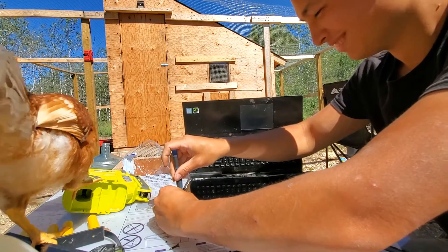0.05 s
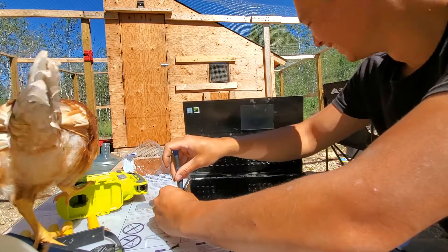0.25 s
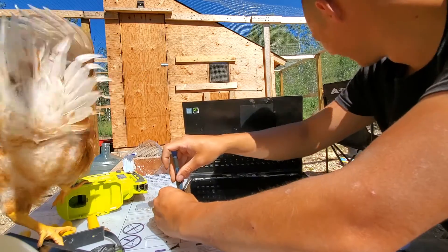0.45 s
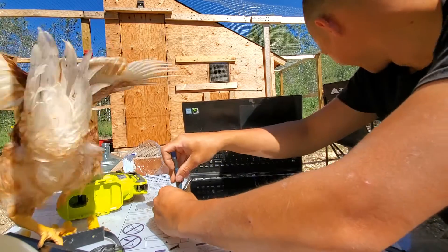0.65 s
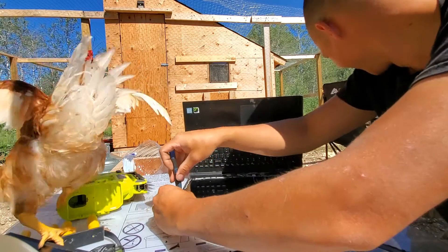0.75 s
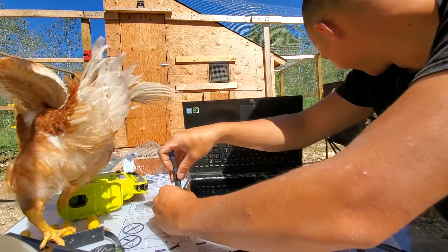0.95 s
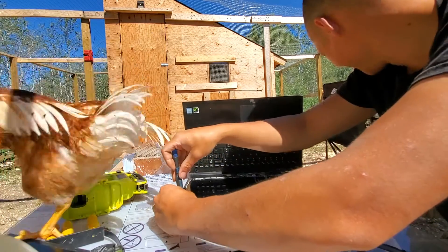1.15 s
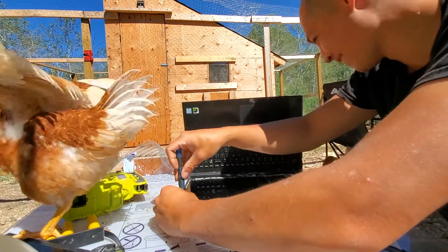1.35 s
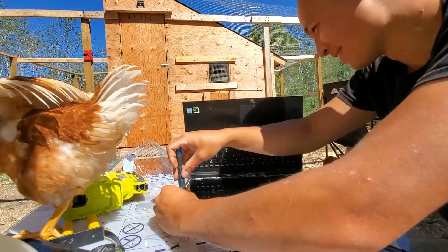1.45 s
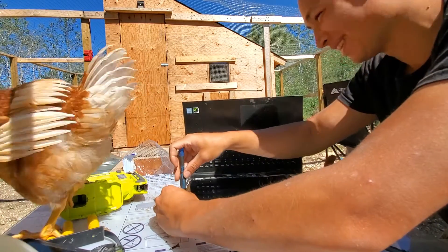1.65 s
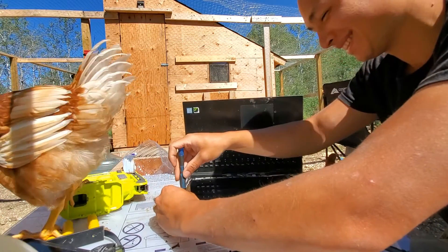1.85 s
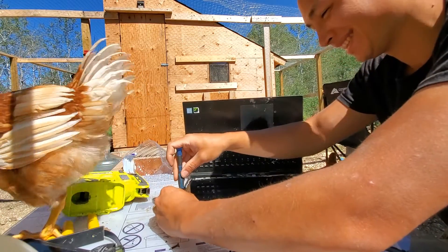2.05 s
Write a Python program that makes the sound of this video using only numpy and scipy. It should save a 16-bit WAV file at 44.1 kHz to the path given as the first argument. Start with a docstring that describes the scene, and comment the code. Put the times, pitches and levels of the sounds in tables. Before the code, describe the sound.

Wing flaps from a chicken crack and clatter in two bursts, close and slightly left in a yard, the first one louder. Feathers rustle softly in between, and puffs of air buffet the microphone over a faint hiss.

```python
"""A hen flaps her wings in two bursts on a garden table, just left of the microphone.
Each wing slap is a crack and a clatter of quills that shakes the table and echoes off the coop.
In between, feathers flick and brush and the wings sweep softly through the air.
Moving air bumps and rumbles against the microphone over a faint hiss."""
import sys
import numpy as np
from scipy import signal
from scipy.fft import rfft, irfft
from scipy.io import wavfile
from scipy.ndimage import uniform_filter1d

SR = 44100
rng = np.random.default_rng(int(sys.argv[2]) if len(sys.argv) > 2 else 0)


def wrap_up_sound(samples):
    """Save the sound to the file named by the first command line argument, as 16-bit audio."""
    columns = np.atleast_2d(samples).T
    # keep every value between -1 and 1, then stretch to whole-number steps
    tamed = np.clip(columns, -1, 1)
    steps = np.round(tamed * 32767).astype(np.int16)
    wavfile.write(sys.argv[1], SR, steps)


N = 92610


def wing_slaps(attack_s=.0007, crack_s=0.0023, snap_s=0.0059):
    """Each slap is a sharp crack and the snap of a feather shaft, then a dying clatter of quills."""
    # Slaps: start_s, level_db, fade_s (time to fall 60 dB), bass_db, treble_db, snap_hz
    slaps = [(.2028, -13.7, .095, -5, 1.5, 1000), (.221, -18, 0.07, 0.5, 0, 3380),
             (0.2316, -15.5, 0.0763, -0.5, 0, 1230), (.244, -23.5, 0.03, 11, 2, 710),
             (.263, -24, 0.01, 0.5, 4.5, 1420), (.281, -30, 0.03, 5.5, 6.5, 5000),
             (.298, -26.5, 0.06, -11, 5.5, 2400), (.318, -15.5, 0.0538, -2, -1, 1500),
             (.333, -20, 0.11, 4, 1, 870), (.362, -28.5, 0.0152, 6, 2, 493),
             (.422, -37, 0.14, 1.5, -6, 1600), (.436, -33, .05, -1, -4, 1200),
             (.508, -32.5, 0.09, 2, 2.5, 3030), (.711, -35, 0.08, -2, -25, 695),
             (.7365, -29, .05, -1.5, 1, 2930), (1.038, -43, .14, 0, -10, 600),
             (1.0646, -30, 0.06, -6, 4, 3970), (1.1516, -19.5, 0.05, 3, -12, 706),
             (1.169, -32, .05, 9, -2, 500), (1.2133, -22.5, 0.02, -3, 1.5, 2270)]
    # Tone of the slaps: frequency_hz, level_db
    tone = [(40, -18.5), (100, -1.5), (190, -0.5), (245, -0.5), (305, 2), (390, -6), (500, -1), (750, -5),
            (1100, -5), (1550, -10.5), (2100, -10.5), (2800, -15.5), (3900, -19), (5300, -30.5),
            (8000, -36.5), (12000, -46.5), (16000, -51)]
    out, t = np.zeros(N), np.arange(SR // 4) / SR
    for start_s, level_db, fade_s, bass_db, treble_db, snap_hz in slaps:
        slap = quills(len(t)) * np.minimum(t / attack_s, 1) * fade(t, fade_s)
        slap[round(attack_s * SR)] -= amp(-8) * np.sqrt(crack_s * SR)  # one spike is the crack
        snap = signal.lfilter(*signal.iirpeak(snap_hz, Q=1.46, fs=SR), slap * np.exp(-t / snap_s))
        slap = slap + amp(3.5) * snap + (amp(bass_db) - 1) * gentle_filter(slap, 296, "low")
        slap = slap + (amp(treble_db) - 1) * gentle_filter(slap, 1730, "high")
        add(out, start_s, amp(level_db) * slap)
    return colour(out, tone)


def quills(samples, clicks_per_s=2400, spread_db=4, smooth_share=0.41):
    """Quills clatter: dense clicks of uneven size over a little smooth noise."""
    sizes = amp(spread_db * np.minimum(rng.exponential(1, samples), 3))
    clicks = sizes * rng.choice([-1, 1], samples) * (rng.random(samples) < clicks_per_s / SR)
    smooth = rng.standard_normal(samples)
    return np.sqrt(1 - smooth_share) * unit(clicks) + np.sqrt(smooth_share) * smooth


def table_ring(slaps):
    """The table top rings briefly under the slaps."""
    # Notes of the table top: pitch_hz, level_db, fade_s
    notes = [(186, 0.5, 0.25), (250.7, -4.5, 0.26), (312.2, -2, .33), (477.8, -3.5, 0.15), (580, -9, 0.2),
             (900, -22, .15)]
    t = np.arange(SR // 2) / SR
    ring = sum(amp(level_db) * fade(t, fade_s) * np.cos(2 * np.pi * pitch_hz * t) / fade_s
               for pitch_hz, level_db, fade_s in notes)
    return amp(-10) * np.std(slaps) * unit(signal.fftconvolve(slaps, ring)[:N])


def feather_strokes(strokes, tone, skew):
    """Sliding feathers make grainy noise that swells and fades; a lower skew peaks sooner."""
    out = np.zeros(N)
    for start_s, level_db, length_s in strokes:
        progress = np.linspace(0, 1, round(length_s * SR))
        swell = np.sin(np.pi * progress ** skew) ** 2
        add(out, start_s, amp(level_db) * swell * quills(SR // 4)[:len(swell)])
    return colour(out, tone)


def feathers():
    """Feathers flick brightly, brush together and sweep softly through the air."""
    # Feather movements: start_s, level_db, length_s
    flicks = [(.203, -47, .012), (.220, -41, 0.01), (.279, -41, .01), (.321, -42, 0.0057),
              (.427, -32, 0.0062), (.507, -43, .012), (.537, -43, .008), (.542, -39, 0.0072),
              (.55, -56, 0.08), (.735, -42.5, 0.0082), (.856, -46, .006), (1.063, -37.5, 0.008),
              (1.095, -48, 0.052), (1.151, -35, 0.0065), (1.159, -42, 0.036)]
    brushes = [(.095, -45, .1), (.49, -53.5, .1), (1.08, -54.5, 0.096)]
    sweeps = [(.10, -51, 0.15), (.555, -38, 0.099), (1.055, -38, 0.053)]
    # Tone of each movement: frequency_hz, level_db
    flick_tone = [(500, -30), (3000, -14), (5000, -2.5), (8000, 1.5), (11000, -6), (16000, -5.5)]
    brush_tone = [(200, 3), (1000, 1.5), (2000, 3), (4000, -2), (8000, -6.5), (16000, -9)]
    sweep_tone = [(80, -9.5), (280, -1), (450, -2.5), (680, -4), (1000, -13.5), (3000, -24.5), (16000, -45)]
    return (feather_strokes(flicks, flick_tone, skew=0.64)
            + feather_strokes(brushes, brush_tone, skew=0.73)
            + feather_strokes(sweeps, sweep_tone, skew=0.74))


def from_left(hen, delay_s=0.0001896):
    """The right side of the microphone hears the hen later and duller."""
    # Dulling on the far side: frequency_hz, gain_db
    far_tone = [(100, -2), (400, -0.5), (1200, -6), (2100, -6), (3200, -11), (4200, -11.5), (5500, -8.5),
                (9000, -14), (16000, -5)]
    hz = np.fft.rfftfreq(2 * N, 1 / SR)
    late = irfft(rfft(hen, 2 * N) * np.exp(-2j * np.pi * hz * delay_s))[:N]
    return np.array([hen, colour(late, far_tone, keep_level=False)])


def nearby_echoes(hen, count=7, left_db=-11.5, right_db=-8):
    """Small things on the table throw back quick echoes with little bass."""
    out, thin = np.zeros((2, N)), gentle_filter(hen, 500, "high")
    for side, level_db in zip(out, (left_db, right_db)):
        for delay_s in rng.uniform(.0004, .005, count):
            add(side, delay_s, thin * amp(level_db) * rng.choice([-1, 1]) / np.sqrt(count))
    return out


def yard_echoes(hen, half_turns_per_s=9, count=3, left_db=-8, right_db=-10):
    """Echoes off the coop and table; three patterns take turns, as if shifted by the moving wings."""
    angles = np.pi * (half_turns_per_s * np.arange(N) / SR + np.arange(count)[:, None] / count)
    parts = hen * np.cos(angles) * np.sqrt(2 / count)
    echoes = sum(signal.fftconvolve(part[None], echo_tail(), axes=1)[:, :N] for part in parts)
    return amp([[left_db], [right_db]]) * echoes


def echo_tail(build_s=0.0073):
    """One stereo tail of scattered echoes; the treble dies first."""
    # How long the yard echoes: frequency_hz, fade_s
    fade_times = [(100, 0.55), (300, 0.58), (700, 0.37), (1500, 0.25), (4000, .26), (12000, 0.21)]
    # How alike left and right are: frequency_hz, likeness (0 to 1)
    likeness = [(100, 1), (300, 0.87), (650, 0.4), (1400, 0.06), (16000, 0)]
    hz, t, bands = signal.stft(rng.standard_normal((2, SR)), SR, nperseg=256)
    same = look_up(likeness, hz)[:, None]
    bands[1] = same * bands[0] + np.sqrt(1 - same ** 2) * bands[1]
    tail = signal.istft(bands * fade(t, look_up(fade_times, hz)[:, None]), SR, nperseg=256)[1]
    tail *= np.minimum(np.arange(tail.shape[1]) / SR / build_s, 1)
    return tail / np.linalg.norm(tail[0])


def air_puffs(cycles_to_peak=0.97, pitch_scatter=0.049):
    """Each push of air swings the microphone a few times and dies away."""
    # Puffs: start_s, level_db, pitch_hz, left_minus_right_db
    puffs = [(0.041, -30.5, 168, 16), (0.096, -29.5, 113, 17), (0.146, -28.5, 88, 7.5),
             (0.206, -15.5, 112, 0), (.265, -22.5, 110, 2), (.328, -18, 90, 5), (.36, -15, 98, -2),
             (.502, -23, 87, 11), (0.531, -29, 121, 15), (.648, -32, 103.6, 12), (0.769, -28.5, 74, 6.5),
             (.852, -33.5, 122, 14.5), (.895, -25.5, 76, 18), (1.19, -21.5, 94, -1), (1.287, -23, 81, 4),
             (1.465, -26, 53, -3), (1.716, -29, 104, 13), (1.768, -27.5, 131, 12), (1.822, -32, 84, 15)]
    out, t = np.zeros((2, N)), np.arange(SR // 5) / SR
    for start_s, level_db, pitch_hz, pan_db in puffs:
        cycles = t * pitch_hz * (1 + pitch_scatter * rng.standard_normal())
        age = cycles / cycles_to_peak
        swell = age * np.exp((1 - age ** 2) / 2)
        swing = np.sin(2 * np.pi * (cycles + rng.random()))
        add(out, start_s, amp(level_db) * amp([[pan_db / 2], [-pan_db / 2]]) * swell * swing)
    return out


def wind(gusts_per_s=13.85, steady_s=0.055):
    """Swirling air makes a lumpy rumble, different on each side of the microphone."""
    # Wind strength: time_s, left_db, right_db
    strength = [(0, -44.5, -45), (.06, -27.5, -46), (.17, -31.5, -34.5), (.26, -30.5, -30), (.39, -28, -29),
                (.46, -32.5, -39), (.56, -28, -36), (0.701, -34, -39.5), (.8, -26.5, -30), (.9, -28, -40.5),
                (.97, -33.5, -43), (1.14, -30.5, -33), (1.32, -28.5, -29), (1.41, -39.5, -43),
                (1.48, -30.5, -24), (1.57, -34, -42), (1.64, -28, -42), (1.7, -37.5, -42.5),
                (1.83, -31, -42), (1.89, -46, -47), (2.1, -49, -51.5)]
    # Tone of the rumble: frequency_hz, level_db
    tone = [(15, -35), (30, -16.5), (45, -3.5), (70, -0.5), (100, -7.5), (150, -20), (250, -29.5),
            (400, -42.5), (1000, -69), (4000, -90)]
    times_s, *sides_db = np.transpose(strength)
    t, out = np.arange(N) / SR, []
    for level_db in sides_db:
        rumble = colour(rng.standard_normal(N + SR), tone)[SR:]
        rumble /= np.sqrt(uniform_filter1d(rumble ** 2, round(steady_s * SR)) + 1e-9)  # even it out
        gust_db = np.interp(t * gusts_per_s, np.arange(100), rng.standard_normal(100))
        out.append(rumble * amp(np.interp(t, times_s, level_db) + gust_db))
    return np.array(out)


def hiss():
    """A faint, steady background with a narrow band of high hiss."""
    # Tone of the hiss: frequency_hz, level_db
    tone = [(30, -6.5), (200, 1), (500, -0.5), (1000, -5.5), (2000, -8.5), (4000, -7.5), (6500, -7.5),
            (8000, -9), (8700, -1), (9400, -11), (10200, -14.5), (16000, -17.5)]
    # Dulling on the right: frequency_hz, gain_db
    right_tone = [(100, -2), (1000, -2.5), (2500, -6), (5000, -8), (9000, -10), (16000, -11)]
    left, right = (colour(rng.standard_normal(N + SR), tone)[SR:] for _ in range(2))
    return amp(-47.5) * np.array([left, colour(right, right_tone, keep_level=False)])


def amp(db):
    """Turns decibels into a gain."""
    return 10 ** (np.asarray(db) / 20)


def fade(t, fade_s):
    """Falls by 60 dB every fade_s seconds."""
    return np.exp(-np.log(1000) * t / fade_s)


def unit(x):
    """Scales a sound to an average power of 1."""
    return x / np.sqrt(np.mean(x ** 2) + 1e-20)


def look_up(points, hz):
    """Reads between a table's rows on a log-frequency scale."""
    row_hz, values = np.transpose(points)
    return np.interp(np.log(hz + 1), np.log(row_hz + 1), values)


def add(mix, start_s, sound):
    """Lays a sound into the mix."""
    part = mix[..., max(round(start_s * SR), 0):][..., :sound.shape[-1]]
    part += sound[..., :part.shape[-1]]


def colour(x, tone, keep_level=True, size=8192):
    """Filters a sound to follow a tone table, with no ringing ahead of a hit."""
    log_gain = np.log(amp(look_up(tone, abs(np.fft.fftfreq(size, 1 / SR)))))
    taps = np.fft.ifft(np.exp(np.conj(signal.hilbert(log_gain)))).real[:size // 2]
    return signal.fftconvolve(x, taps / (np.linalg.norm(taps) if keep_level else 1))[:len(x)]


def gentle_filter(x, hz, kind):
    """Keeps mostly the "low" or the "high" side of hz."""
    return signal.sosfilt(signal.butter(1, hz, kind, fs=SR, output="sos"), x)


def scene():
    """The hen, her echoes, the air and the background."""
    slaps = wing_slaps()
    hen = slaps + table_ring(slaps) + feathers()
    return from_left(hen) + nearby_echoes(hen) + yard_echoes(hen) + air_puffs() + wind() + hiss()


def record(dry, top_hz=16050):
    """Cuts off the very highest treble."""
    taps = signal.firwin(511, top_hz, window=("kaiser", 9), fs=SR)
    return signal.oaconvolve(dry, taps[None], "same")


dry = scene()
out = record(dry)
wrap_up_sound(out)
```